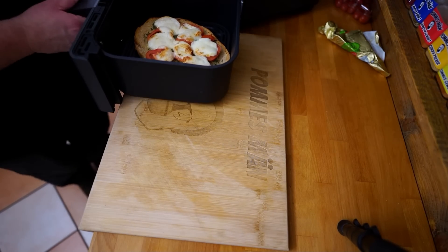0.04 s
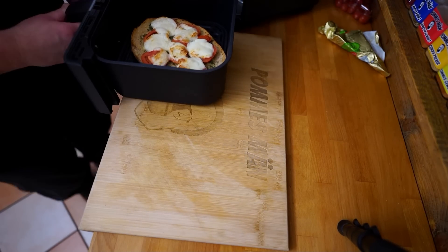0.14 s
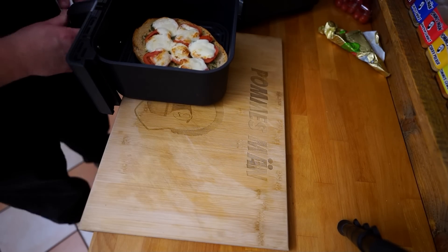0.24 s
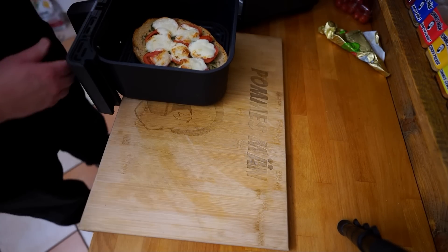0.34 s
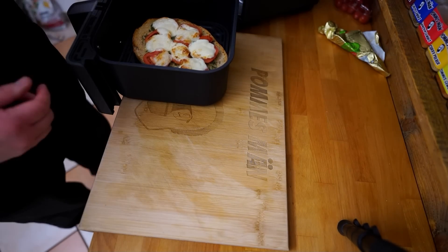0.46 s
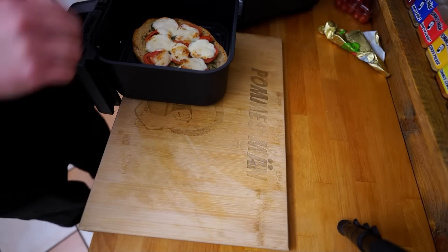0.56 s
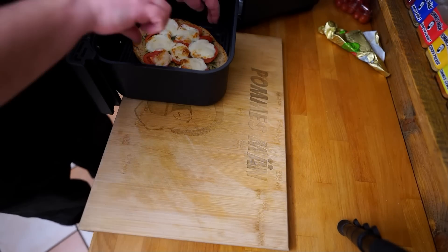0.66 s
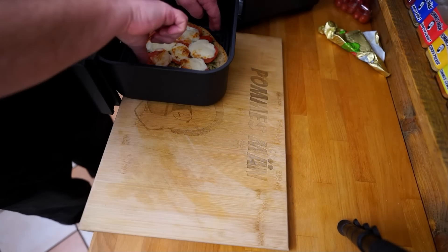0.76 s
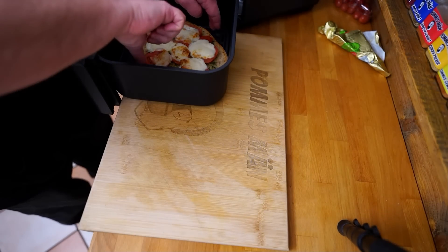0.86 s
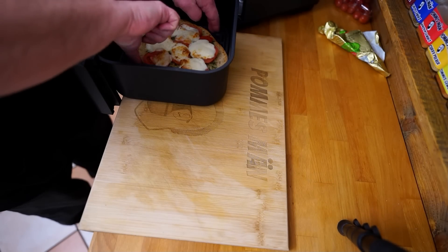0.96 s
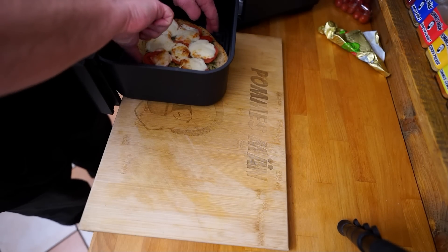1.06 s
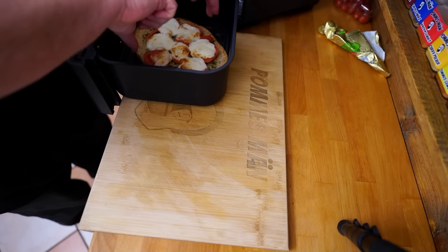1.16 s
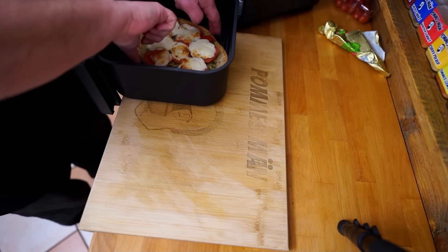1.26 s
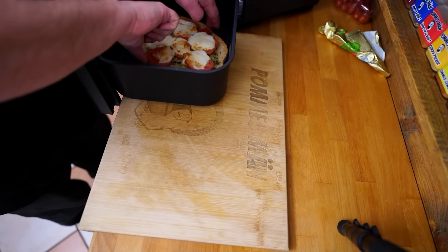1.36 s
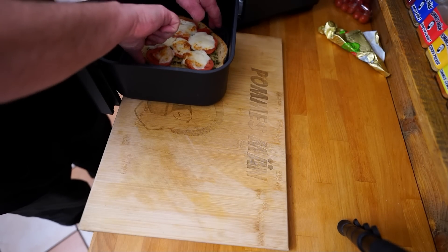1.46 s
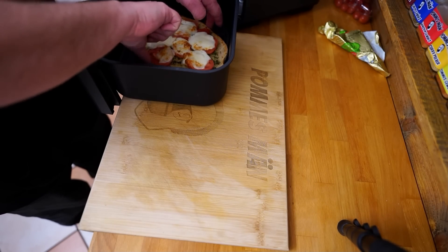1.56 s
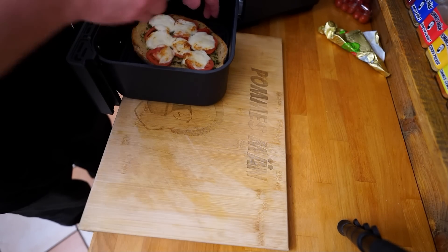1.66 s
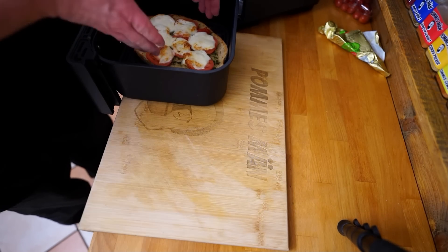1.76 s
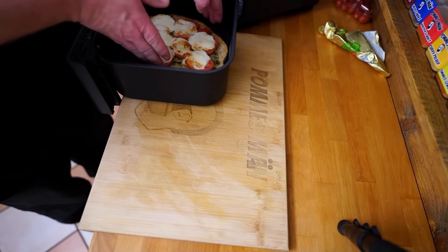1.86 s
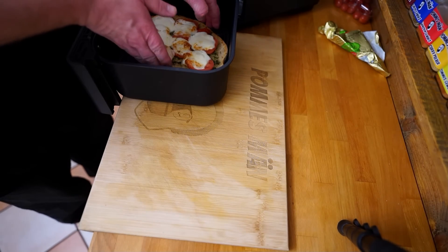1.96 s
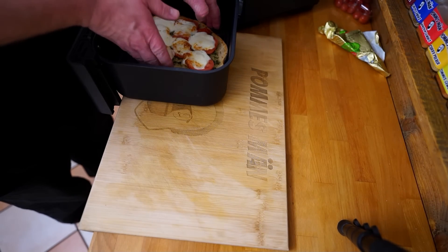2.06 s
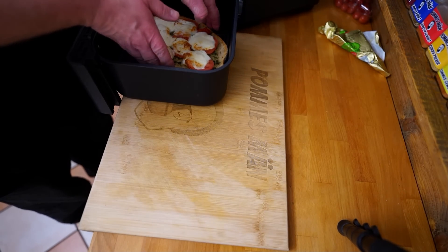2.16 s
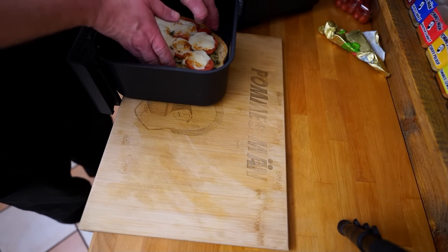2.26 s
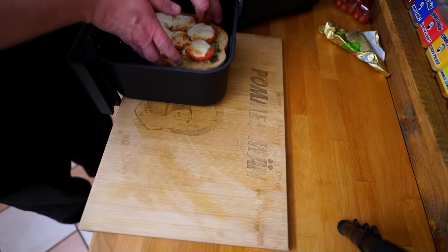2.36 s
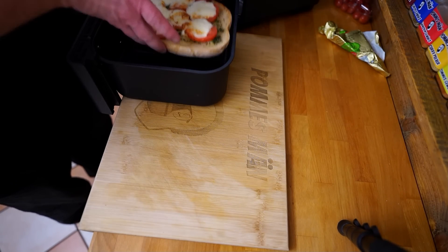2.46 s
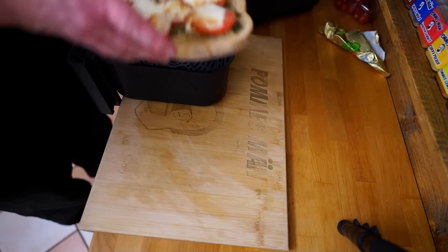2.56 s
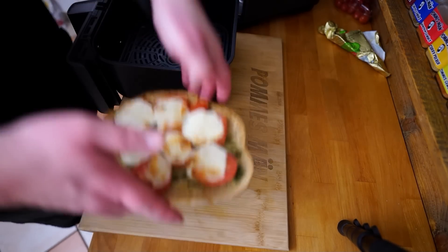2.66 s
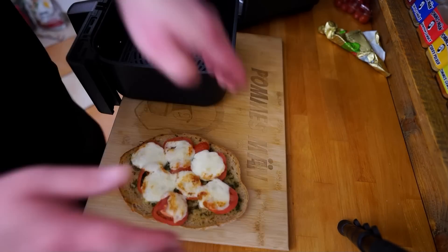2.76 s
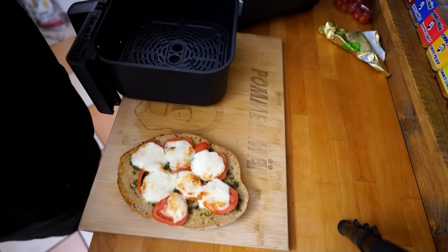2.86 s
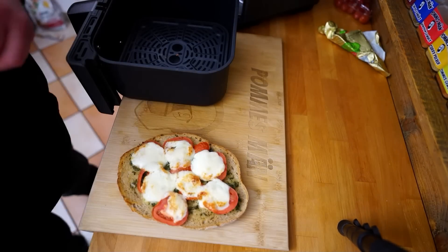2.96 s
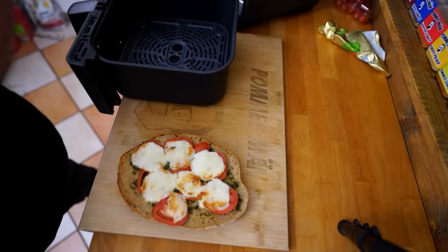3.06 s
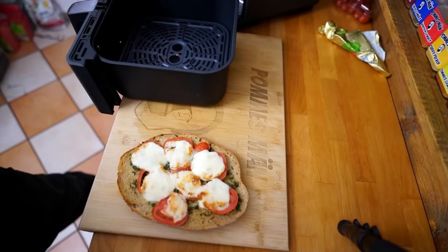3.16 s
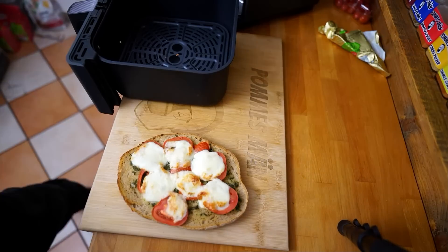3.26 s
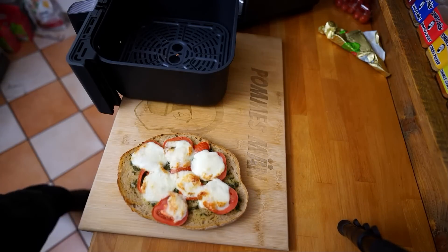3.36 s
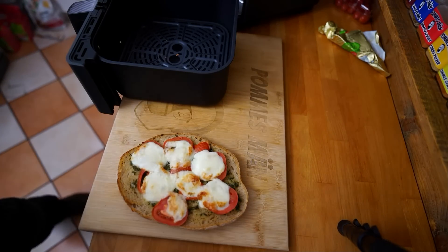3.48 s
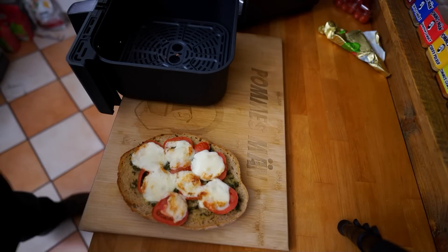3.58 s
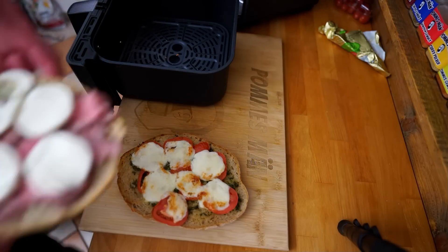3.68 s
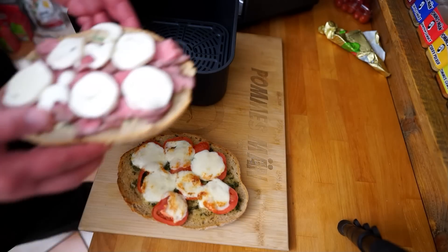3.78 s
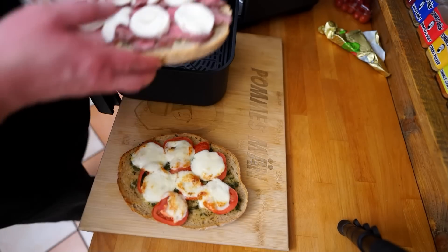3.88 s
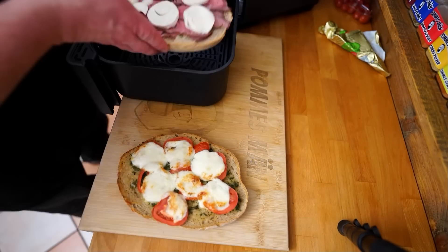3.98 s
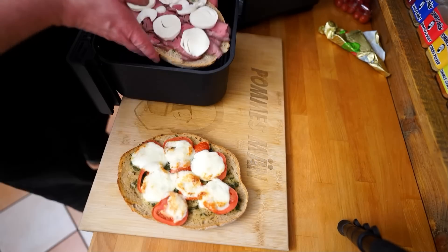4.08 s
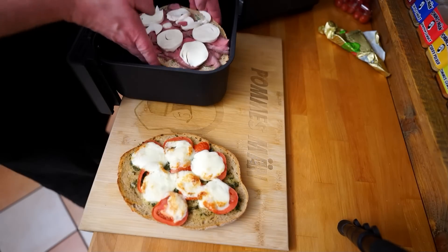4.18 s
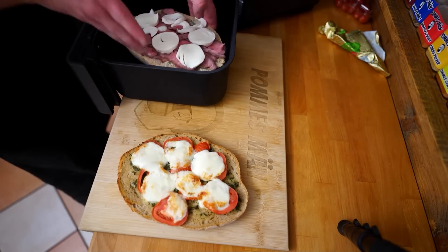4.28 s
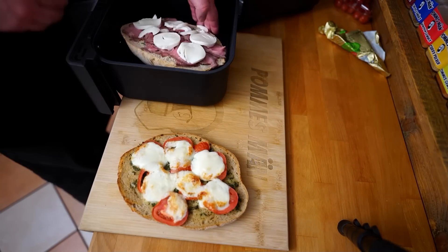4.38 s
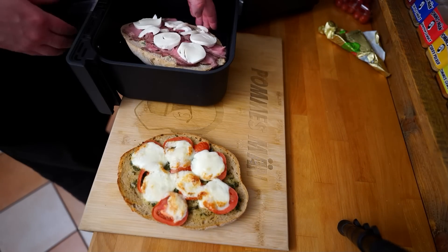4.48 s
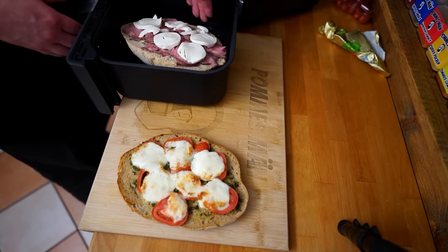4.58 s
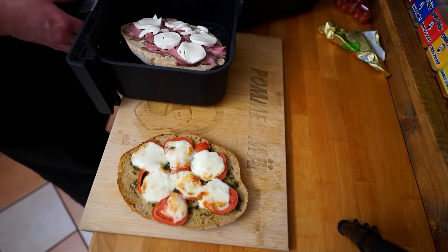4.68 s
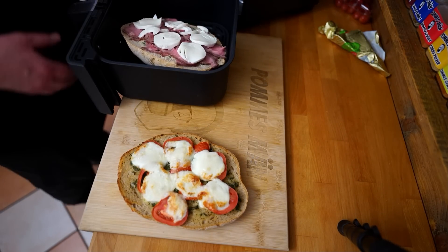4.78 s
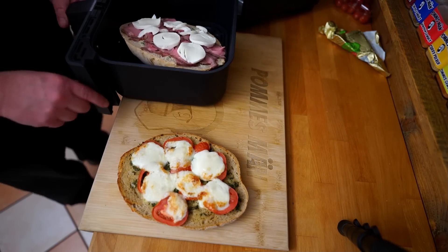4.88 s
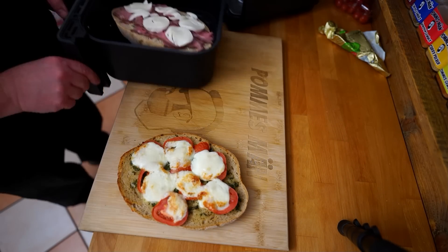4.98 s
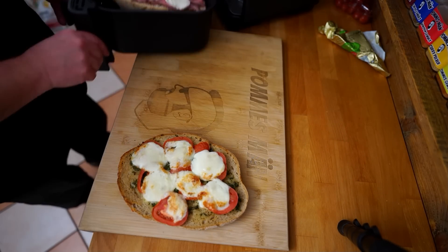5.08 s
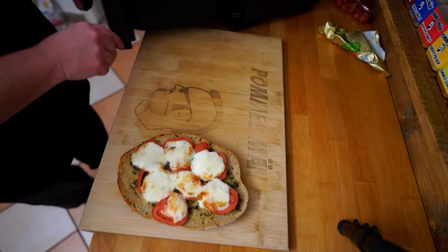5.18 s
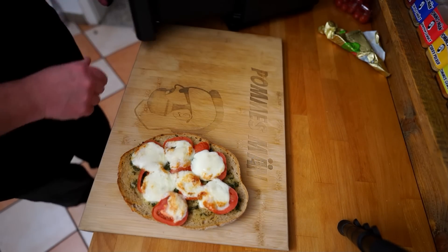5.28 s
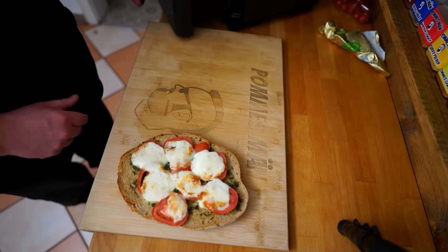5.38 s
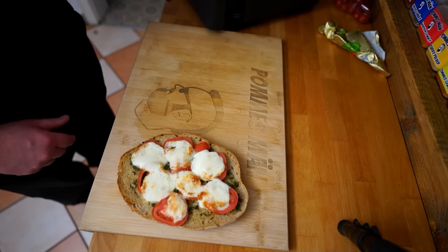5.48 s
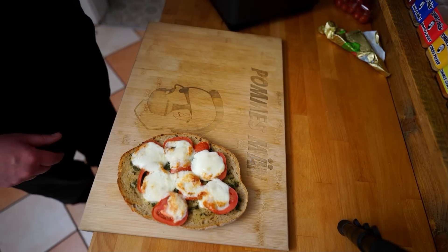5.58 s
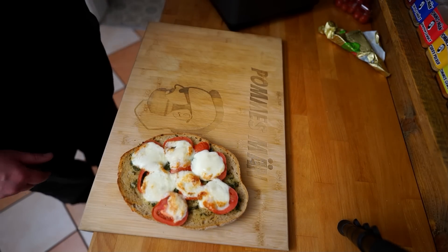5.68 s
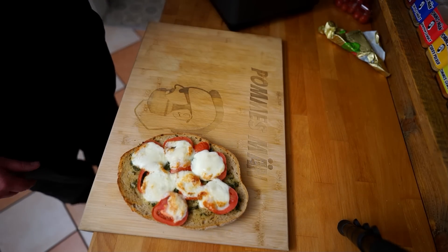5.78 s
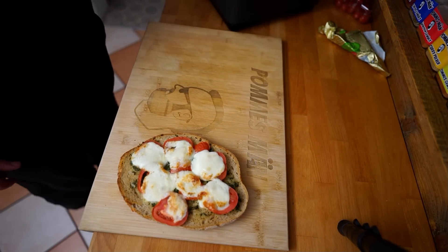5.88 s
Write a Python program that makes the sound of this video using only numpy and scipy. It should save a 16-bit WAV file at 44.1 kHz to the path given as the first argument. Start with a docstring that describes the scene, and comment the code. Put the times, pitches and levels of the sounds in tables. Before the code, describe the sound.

Close, dry sound over a very faint appliance hum and hiss: a few hollow basket knocks, near quiet with small finger brushes, a crisp crackle, then a fleshy slap of bread on board. Sleeves rustle, light thuds come as another bread enters the basket, a rough scrape follows, and loud boxy bangs end with a click and fading small bumps.

```python
"""An air fryer basket is set on a wooden board, gripped, dragged off and pushed into the fryer until the catch snaps.
In between, a baked flatbread is picked out and dropped on the board, and a raw one is laid in.
Basket, board and the fryer's hollow, booming case ring in their own modes when hit; sliding is made of tiny slips.
Crust and catch snap in bursts of noise, sleeves swish, and a faint appliance hum fills a small, dry kitchen."""
import sys
import numpy as np
from scipy import signal
from scipy.fft import rfft, irfft, next_fast_len
from scipy.io import wavfile
from scipy.ndimage import map_coordinates

SR = 44100
rng = np.random.default_rng(int(sys.argv[2]) if len(sys.argv) > 2 else 0)


def waveform_to_disk(signal):
    """Save audio, clipped to [-1, 1], as 16-bit WAV at the path in sys.argv[1]."""
    frames = np.transpose(np.atleast_2d(signal))
    scaled = np.clip(frames, -1, 1) * 32767
    samples = np.round(scaled).astype(np.int16)
    wavfile.write(sys.argv[1], SR, samples)


N = 261954  # length of the scene in samples


def amp(db):
    """Turn decibels into a gain."""
    return 10 ** (np.asarray(db) / 20)


def unit(x, span=N / SR):
    """Scale x so that its first span seconds have an rms level of 1."""
    beginning = x[:max(int(span * SR), 8)]
    return x / np.sqrt(np.mean(beginning ** 2) + 1e-20)


def along(points, hz):
    """Read a curve of (Hz, value) points at any frequency, on a log axis."""
    f, v = np.transpose(points)
    return np.interp(np.log(hz + 1), np.log(f + 1), v)


def filtered(x, response):
    """Multiply the spectrum of x by a function of frequency."""
    size = next_fast_len(len(x) + SR // 4)
    spectrum = rfft(x, size) * response(np.fft.rfftfreq(size, 1 / SR))
    return irfft(spectrum, size)[:len(x)]


def coloured(x, spectrum):
    """Boost or weaken each frequency of x by a (Hz, dB) curve."""
    return filtered(x, lambda hz: amp(along(spectrum, hz)))


def band(x, lo_hz, hi_hz, order=3):
    """Keep mainly the range between two frequencies."""
    edges = [lo_hz, min(hi_hz, SR / 2 - 100)]
    return signal.sosfilt(signal.butter(order, edges, "band", fs=SR, output="sos"), x)


def wobble(rate):
    """Draw a smooth random curve with rate new values a second."""
    values = rng.standard_normal(int(N * rate / SR) + 4)
    return map_coordinates(values, [np.arange(N) * rate / SR])


def add(track, s, sound):
    """Mix a sound into the track at time s."""
    start = max(round(s * SR), 0)
    track[start:start + len(sound)] += sound[:N - start]


def stroke(middle, length, squareness):
    """Pressure of a sliding contact: it swells, holds and lets go."""
    distance = np.abs(2 * (np.arange(N) / SR - middle) / length)
    return np.exp(-np.minimum(distance, 20) ** squareness)


def grains(rate, spread_db):
    """Tiny slips of uneven size, at random moments, about rate of them a second."""
    happens = rng.random(N) < rate / SR
    return happens * rng.standard_normal(N) * amp(spread_db * rng.standard_normal(N))


def blows(rows, modes, voice_db, focus, tilt_db, crack_db, rattle_db, span=.012):
    """Each blow rings an object's clear modes and a cracking, rattling crowd of dense ones.

    It is strongest near its contact frequency (low for a long contact) and falls away on both sides: its softness.
    """
    # Thud, knock, clack and tick. Each row: centre in Hz, low end in Hz, highest end in Hz,
    # fading time (60 dB) of the dense modes in seconds, their share of the power from 0 to 1, shortest rise in seconds.
    parts = [(152, 55, 330, 0.15, 0.08, 0.0028), (630, 291, 2350, 0.092, 0.54, 0.0004),
             (3080, 1737, 5200, 0.076, 0.7, 0.0013), (9400, 6100, 22000, 0.073, 1, 0.00057)]
    most_cycles = 260  # plastic and wood damp every mode within this many cycles
    track, t = np.zeros(N), np.arange(SR // 3) / SR
    hz, mode_db, t60 = np.transpose(modes)[:, :, None]
    fading_s = np.minimum(t60, most_cycles / hz)
    ringing = amp(mode_db - 60 * t / fading_s) * np.sin(2 * np.pi * hz * t)
    crack = 1 + amp(crack_db - 60 * t / 0.013)
    centres = np.transpose(parts)[0]
    for s, blow_db, contact_hz, softness in rows:
        # parts far from the contact frequency are weak, the more so the softer the blow
        levels = blow_db + np.array(voice_db) - softness * np.abs(np.log2(centres / contact_hz))

        def favour(f):
            """The contact time favours modes near one frequency and drives higher ones less."""
            peak = 1 + focus / (1 + (11.0 * np.log2((f + 1) / contact_hz)) ** 2)
            return peak * amp(tilt_db * np.log2(np.hypot(1, np.minimum(f, 6000) / contact_hz)))

        strength = favour(hz) * amp(rng.standard_normal(hz.shape))
        rattle = amp(rattle_db * np.interp(t, t[::64], rng.standard_normal(len(t[::64]))))
        crowd = filtered(crack * rattle * rng.standard_normal(len(t)), favour)
        # a cushioned blow, with little clack beside its knock, builds up more slowly
        cushion = np.clip((levels[1] - levels[2]) / 8, 1, 4)
        for db, (_, lo, hi, life, share, rise) in zip(levels, parts):
            top_hz = min(hi, max(2.2 * contact_hz, 3.2 * lo))  # long contacts are dull
            attack = 1 - np.exp(-t / (rise * cushion))
            inside = 1 / (1 + (lo / hz) ** 6 + (hz / top_hz) ** 6)
            clear = unit((inside * strength)[:, 0] @ ringing * attack, span)
            dense = unit(band(crowd * attack * amp(-60 * t / life), lo, top_hz), span)
            part = np.sqrt(1 - share) * clear + np.sqrt(share) * dense
            add(track, s, amp(db) * unit(part, span + 3 * rise))
    return track


def room(x):
    """The room answers with decaying noise, each frequency dying at its own speed."""
    # Each row: frequency in Hz, time to fade by 60 dB in seconds.
    fading = [(100, 0.14), (400, 0.1), (3000, 0.79), (15000, 0.6)]
    hz, t, z = signal.stft(rng.standard_normal(SR // 2), SR, nperseg=256)
    tail = signal.istft(z * amp(-60 * t / along(fading, hz)[:, None]), SR, nperseg=256)[1]
    delayed = np.pad(x, (SR // 150, 0))
    return signal.fftconvolve(delayed, tail / np.linalg.norm(tail))[:N]


def reflections(x):
    """Small hard surfaces close by return the upper range and comb it."""
    # Worktop, splashback and cupboard. Each row: delay in seconds, gain as a plain factor.
    surfaces = [(.0017, 0.065), (.0043, 0.18), (.0071, 0.14)]
    bright = band(x, 1500, 16000, order=1)
    return sum(gain * np.pad(bright, (round(delay * SR), 0))[:N] for delay, gain in surfaces)


def kitchen():
    """A slightly unsteady appliance hum of pure tones under soft, filtered hiss."""
    # The tones of the hum. Each row: frequency in Hz, average level in dB.
    tones = [(50, -73.5), (103, -72.5)]
    # The colour of the hiss. Each row: frequency in Hz, relative level in dB.
    air_colour = [(20, -8), (50, -0.5), (110, 0), (180, -7.5), (300, -12), (430, -9.5), (700, -18),
                  (1500, -18), (2300, -24), (3050, -10), (4300, -16.5), (5400, -26.5), (10000, -26.5),
                  (15500, -18.5)]
    t = np.arange(N) / SR
    hum = np.zeros(N)
    for hz, db in tones:
        level = amp(db + 2 * wobble(4)) * np.sqrt(2)
        hum += level * np.sin(2 * np.pi * hz * t + .5 * wobble(5))
    drift = amp(.6 * wobble(3))
    return hum + amp(-62.5) * drift * unit(coloured(rng.standard_normal(N), air_colour))


def sleeves():
    """Cloth brushes on cloth as the arms move; the dull folds and the bright weave catch separately."""
    # Each row: middle in seconds, length in seconds, level in dB.
    swishes = [(0.431, 0.054, -51), (2.745, 0.023, -40.5), (2.932, 0.037, -41.5), (3.128, 0.092, -47),
               (3.648, 0.039, -44.5), (3.881, 0.07, -44.5), (5.167, 0.058, -59), (5.924, 0.11, -55.5)]
    # The colour of the cloth. Each row: frequency in Hz, relative level in dB.
    cloth_colour = [(100, -3), (250, -1.5), (430, 2), (700, -6.5), (1500, -1), (2300, -4), (4200, -6.5),
                    (5500, -19.5), (9000, -20.5), (16000, -34)]
    pressure = sum(amp(db) * stroke(s, length, squareness=0.82) for s, length, db in swishes)
    cloth = coloured(grains(rate=9800, spread_db=-0.5), cloth_colour)
    folds = band(cloth, 83, 1200, order=1)
    weave = cloth - folds
    return pressure * unit(folds * amp(3.4 * wobble(70)) + weave * amp(wobble(82)))


def snapping():
    """Dry crust, crumbs and the catch snap in short, bright bursts of uneven noise."""
    # Each row: start in seconds, level in dB, time to fade by 60 dB in seconds.
    snaps = [(0.137, -32.5, 0.035), (0.652, -56, 0.014), (1.319, -53.5, .015), (2.329, -44.5, 0.017),
             (2.385, -48, 0.067), (2.447, -52, 0.044), (2.461, -33.5, 0.051), (3.848, -43.5, 0.058),
             (5.626, -34, 0.037)]
    # The colour of the bursts. Each row: frequency in Hz, relative level in dB.
    snap_colour = [(1000, -34), (2500, -13.5), (5000, -5.5), (9000, -6.5), (13000, 5.5), (16000, 2.5)]
    track, t = np.zeros(N), np.arange(SR // 8) / SR
    for s, db, t60 in snaps:
        cracks = rng.standard_normal(len(t)) * amp(2.8 * rng.standard_normal(len(t)) - 60 * t / t60)
        add(track, s, amp(db) * unit(coloured(cracks, snap_colour), 0.0091))
    return track


def board():
    """The falling flatbread squeezes out a puff of air and flops from hard edge to soft middle; bumps ring the wood too."""
    # How the wood rings. Each row: frequency in Hz, relative level in dB, longest time to fade by 60 dB in seconds.
    wood_modes = [(48.6, -10, 0.22), (83.8, -4.5, 0.086), (138, 5, 0.051), (244, 3, 0.04),
                  (405.4, -2.5, 0.081), (597, -8, 0.035), (830, -9, 0.029), (985, -4.5, 0.017),
                  (1194, -3, 0.019), (1524, -12, 0.056), (2060, -22.5, 0.039), (2560, -19, .035)]
    # How readily the board gives thud, knock, clack and tick, each in dB.
    wood_voice = (2, -2, -3, -2.5)
    # Dull bumps on the board and worktop. Each row: start in seconds, strength in dB.
    bump_rows = [(2.68, -43), (2.82, -28), (3.532, -54), (4.44, -56)]
    bump_hz, bump_softness = 120, 6.5  # contact frequency, dB per octave
    # the bread lands in a run of contacts, ever further apart and lower
    flop_start_s, first_gap_s, gap_growth = 2.755, .0036, 1.34
    flop_db, arch_db = -14.5, 2.5  # peak of the run; how much weaker the first and last contacts are
    edge_hz, flat_hz, sink_s = 1000, 112, .016  # contact of edge and soft middle; time constant of the fall
    flop_softness = 7.3  # dB per octave
    puff_lead_s, puff_s, puff_db = .008, .036, -39.5

    through = np.linspace(0, 1, 6)
    age = first_gap_s * (gap_growth ** np.arange(len(through)) - 1) / (gap_growth - 1)
    contact_db = flop_db - arch_db * (2 * through - 1) ** 2
    contact_hz = flat_hz + (edge_hz - flat_hz) * np.exp(-age / sink_s)
    flop = zip(flop_start_s + age, contact_db, contact_hz, np.full(len(through), flop_softness))
    bumps = [(s, db, bump_hz, bump_softness) for s, db in bump_rows]
    wood = blows([*flop, *bumps], wood_modes, wood_voice, focus=2.0, tilt_db=-9, crack_db=7.5, rattle_db=7.0)
    air = unit(band(rng.standard_normal(N), lo_hz=780, hi_hz=1350))
    return wood + amp(puff_db) * stroke(flop_start_s - puff_lead_s, puff_s, squareness=3.1) * air


def fryer():
    """The hollow case booms in its own modes under every hit of the basket."""
    # How the case rings. Each row: frequency in Hz, relative level in dB, longest time to fade by 60 dB in seconds.
    case_modes = [(54.5, -20.5, 0.66), (103.6, -12.5, 0.29), (228, 8, 0.1), (224.6, -11, 0.4),
                  (267.2, -10, 0.18), (422.6, -11.5, 0.2), (457.5, -4.5, 0.1), (483, -5, 0.087),
                  (572, -32, 0.031), (748, -16, 0.13), (776, 2, 0.039), (980, -9, 0.11),
                  (1339, -8.5, 0.088), (1465, -5.5, 0.034), (1530, -14, 0.11), (1882, -11.5, 0.026),
                  (2300, -36, 0.13), (2690, -14.5, 0.072), (3590, -28, .07), (4180, -23.5, 0.23),
                  (4240, -24.5, 0.057)]
    # How readily the case gives thud, knock, clack and tick, each in dB.
    case_voice = (5.5, -1, -1, -8.5)
    # The basket hits the fryer's mouth, then its rails, then the back and the catch.
    # Each row: start in seconds, strength in dB, contact frequency in Hz, softness in dB per octave.
    hits = [(5.2355, -4, 1083, 10.5), (5.242, -5.5, 303, 9), (5.261, -19, 1900, 4.5), (5.285, -14, 840, 8),
            (5.309, -21, 400, 8.5), (5.3625, -15.5, 1050, 4), (5.378, -14.5, 468, 6), (5.400, -19, 475, 15),
            (5.478, -34, 232, 7.5), (5.555, -30.5, 1274, 3.5), (5.566, -17, 247, 8.5),
            (5.589, -14.5, 221, 19), (5.604, -34.5, 910, 0.5), (5.622, -24.5, 570, 1.5),
            (5.633, -13.5, 795, 6), (5.640, -22, 1480, 13.5), (5.676, -33, 180, 6.5),
            (5.778, -41.5, 225, 10.5)]
    return blows(hits, case_modes, case_voice, focus=1.7, tilt_db=-10, crack_db=0.5, rattle_db=1)


def friction():
    """Gains of groan, rasp and fizz follow the pressure; brightness adds fizz, and in a scrape also rasp."""
    # The basket dragged off the board. Each row: time in seconds, pressure in dB, brightness in dB.
    drag_path = [(4.91, -43.5, -25), (4.928, -48.5, 8.5), (4.968, -31.5, -10), (4.974, -34, -7.5),
                 (4.99, -32, -15), (5.014, -36.5, -2), (5.076, -34, -3), (5.114, -45, -18.5),
                 (5.15, -69, -11)]
    # Shorter scrapes of the basket on the board and in the fryer.
    # Each row: middle in seconds, length in seconds, pressure in dB, brightness in dB.
    scrape_rows = [(.13, 0.068, -32.5, -20.5), (.226, .014, -34, -44), (5.304, 0.068, -33.5, -14.5),
                   (5.44, 0.17, -39, -6)]
    # Bread and fingers brushing the basket.
    # Each row: middle in seconds, length in seconds, pressure in dB, brightness in dB.
    brush_rows = [(.24, .15, -62, 6), (1.123, 0.043, -54, 1), (1.376, 0.042, -39, -2),
                  (1.587, 0.11, -58, -3), (2.347, 0.065, -59, -1), (3.877, 0.066, -72.5, 13.5),
                  (4.021, 0.142, -61.5, 5.5), (4.31, 0.19, -56.5, -3.5), (4.72, 0.12, -67.5, 4.5),
                  (4.872, 0.041, -46, 1), (5.788, 0.035, -61.5, 18.5)]
    scrape_rasp_db, rasp_per_brightness = 1, 0.49  # rasp over groan; dB it gains for each dB of brightness
    brush_rasp_db = -5.5  # rasp over groan

    def scrape(db, bright):
        """Groan, rasp and fizz gains of the basket scraping."""
        return amp([db, db + scrape_rasp_db + rasp_per_brightness * bright, db + bright])

    def brush(db, bright):
        """Groan, rasp and fizz gains of a light brushing."""
        return amp([db, db + brush_rasp_db, db + bright])

    def strokes(rows, kind):
        """Sum the gains of separate strokes over time."""
        return sum(np.outer(kind(db, bright), stroke(s, length, squareness=1.4))
                   for s, length, db, bright in rows)

    t = np.arange(N) / SR
    s, pressure, brightness = np.transpose(drag_path)
    dragging = (t > s[0]) * (t < s[-1])
    drag = scrape(np.interp(t, s, pressure), np.interp(t, s, brightness)) * dragging
    return drag + strokes(scrape_rows, scrape) + strokes(brush_rows, brush)


def rubbing():
    """Slips under each stroke set the basket's low modes groaning; coarser grit rasps its high ones; crumbs fizz."""
    # Resonances of the rubbed basket. Each row: frequency in Hz, width in Hz, relative level in dB.
    resonances = [(430, 119, 2.5), (548, 65, 1.5), (640, 52, -12.5), (790, 270, -8.5), (908, 100, -5),
                  (1340, 70, -8.5), (1622, 160, -12), (1960, 100, -13), (2126, 85, -13), (2885, 150, -15.5),
                  (3450, 140, -16.5), (4210, 220, -15), (4660, 630, -25)]
    # The colour of the fizz. Each row: frequency in Hz, relative level in dB.
    fizz_colour = [(2500, -13), (5000, -4.5), (7500, 2), (10000, -2), (13500, 2.5), (16000, -6.5)]

    def walls(f):
        """Sum of the resonances, with alternating signs."""
        total = 0
        for k, (centre, width, db) in enumerate(resonances):
            total = total + (-1) ** k * amp(db) * 1j * f * width / (centre * centre - f * f + 1j * f * width)
        return total

    groan, rasp, fizz = friction()
    grip = amp(2 * wobble(350))
    body = filtered(grains(rate=8100, spread_db=2.5) * grip, walls)
    grit = filtered(grains(rate=2200, spread_db=4.0) * grip, walls)
    crumbs = coloured(grains(rate=20000, spread_db=2) * grip, fizz_colour)
    return groan * unit(band(body, 210, 1000)) + rasp * unit(band(grit, 813, 5500)) + fizz * unit(crumbs)


def basket():
    """Each knock rings the basket's modes, then a low thud follows: the basket rocking back onto the board, or
    the limp raw dough slumping after it is patted in."""
    # How the basket rings. Each row: frequency in Hz, relative level in dB, longest time to fade by 60 dB in seconds.
    basket_modes = [(52.54, -13, 0.23), (89.7, -11, 0.083), (121, -6, 0.072), (243.4, -1.5, 0.049),
                    (335, -7, 0.045), (397, 3, 0.062), (488.4, 7.5, 0.046), (550, -3, 0.064),
                    (702, -4, 0.087), (1095, -13.5, 0.085), (1335, -17.5, 0.018), (1522, -13, 0.0766),
                    (2640, -33.5, 0.11)]
    # How readily the basket gives thud, knock, clack and tick, each in dB.
    basket_voice = (0.3, -2.1, -0.8, -.5)
    # The basket set down, nudged, loaded and gripped. Each row: start in seconds, strength in dB,
    # contact frequency in Hz, softness in dB per octave, strength of the settling thud in dB.
    knock_rows = [(.001, -21.5, 632, 8, -34.5), (.124, -17, 550, 9.5, -34), (.157, -7, 305.6, 10, -26),
                  (0.23, -13.5, 560, 22, -31), (.266, -37, 470, 14, -41), (1.133, -33.5, 472, 14.5, -57),
                  (1.383, -49, 398, 6.5, -48), (1.586, -45.5, 474, 9, -48), (4.042, -30, 435, 5.5, -42),
                  (4.063, -34, 500, 6, -32.5), (4.111, -38.5, 520, 10, -48), (4.178, -43.5, 720, 9, -66),
                  (4.203, -29.5, 410, 12.5, -25), (4.242, -34, 393, 10.5, -44), (4.266, -37, 607, 7, -30.5),
                  (4.326, -41.5, 1250, 3, -37.5), (4.866, -24, 622, 29, -36)]
    settle_s, settle_hz, settle_softness = 0.027, 98.3, 8  # delay, contact frequency, dB per octave
    knocks = [row[:4] for row in knock_rows]
    thuds = [(s + settle_s, db, settle_hz, settle_softness) for s, *_, db in knock_rows]
    return blows(knocks + thuds, basket_modes, basket_voice, focus=4.7, tilt_db=-10.0, crack_db=-1.5, rattle_db=6.5)


def scene():
    """Basket, board and fryer close by, with reflections, a faint room answer and the kitchen hum."""
    near = sleeves() + snapping() + board() + fryer() + rubbing() + basket()
    return (near + reflections(near) + amp(-31.5) * room(near) + kitchen())[None]


def record(dry):
    """Round off the tallest peaks, then keep nothing above a top frequency."""
    top_hz = 16000
    rounded = dry[0] / (1 + np.abs(dry[0] / .9) ** 8) ** (1 / 8)
    return filtered(rounded, lambda hz: hz < top_hz)[None]


dry = scene()
out = record(dry)
waveform_to_disk(out)
```